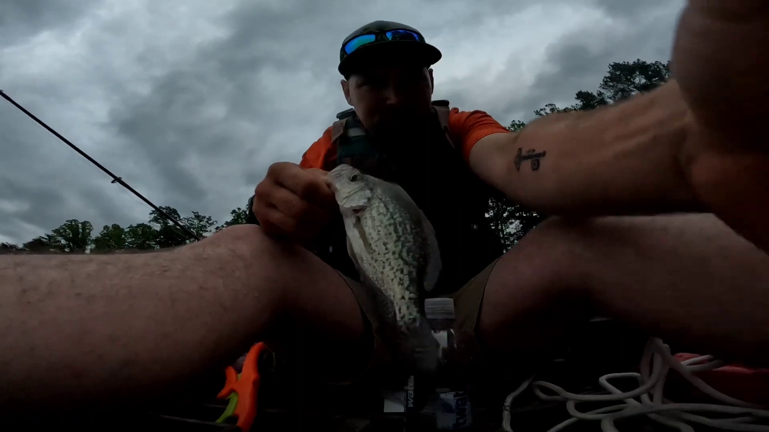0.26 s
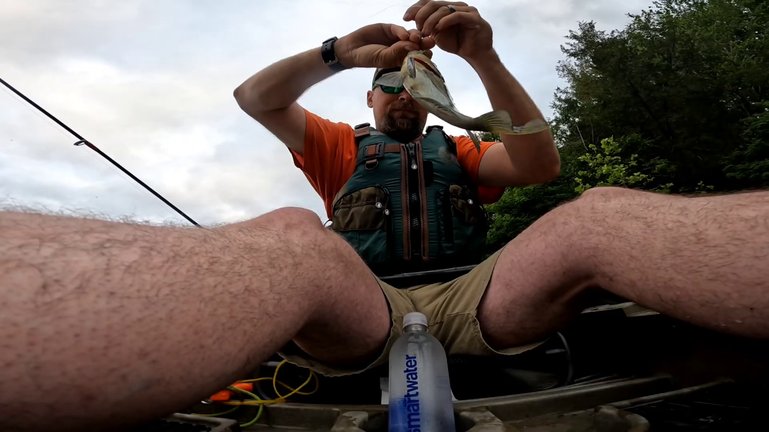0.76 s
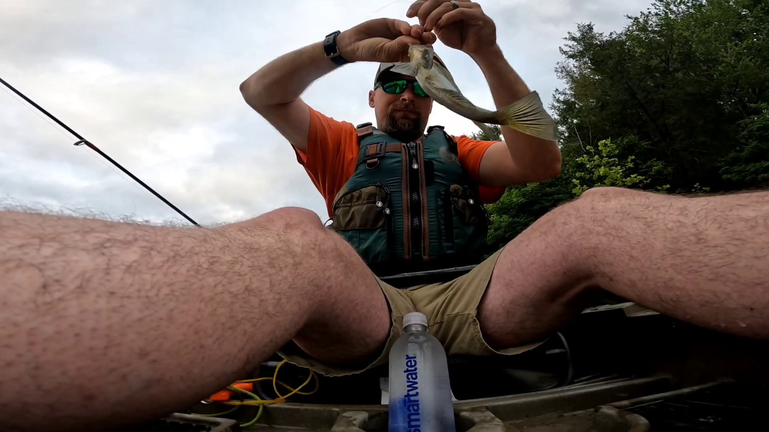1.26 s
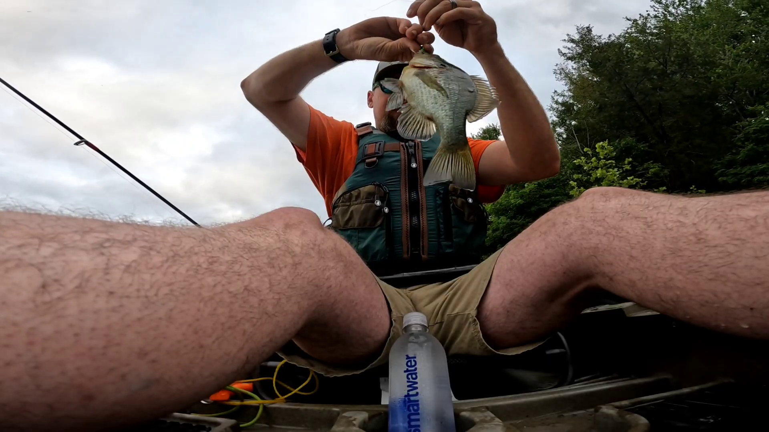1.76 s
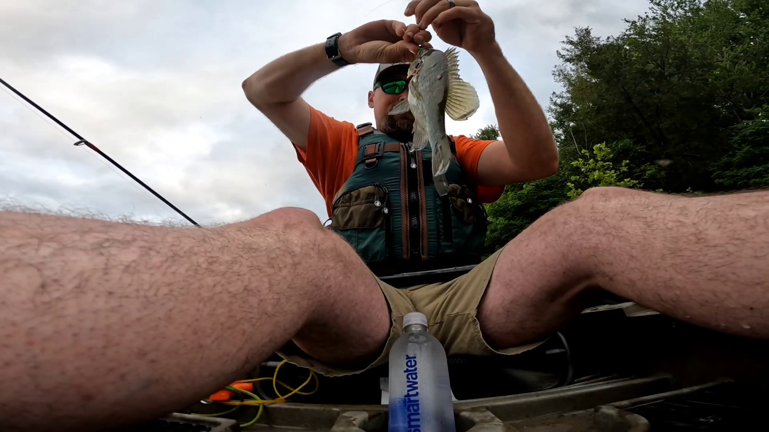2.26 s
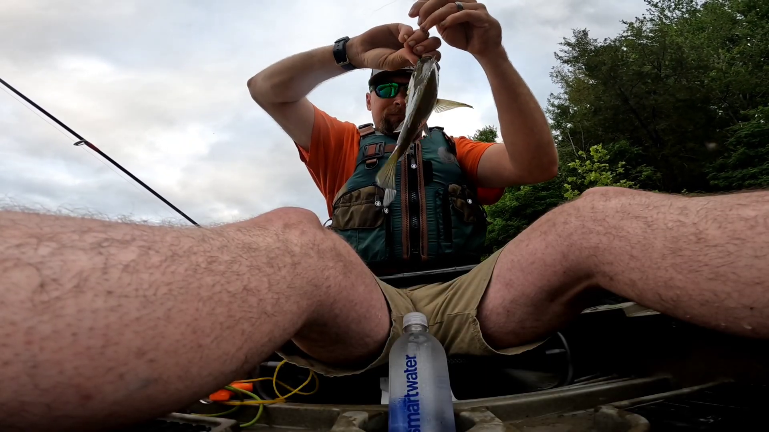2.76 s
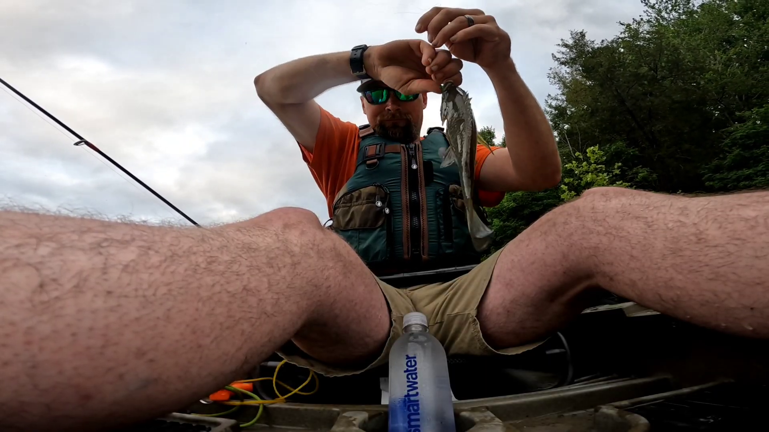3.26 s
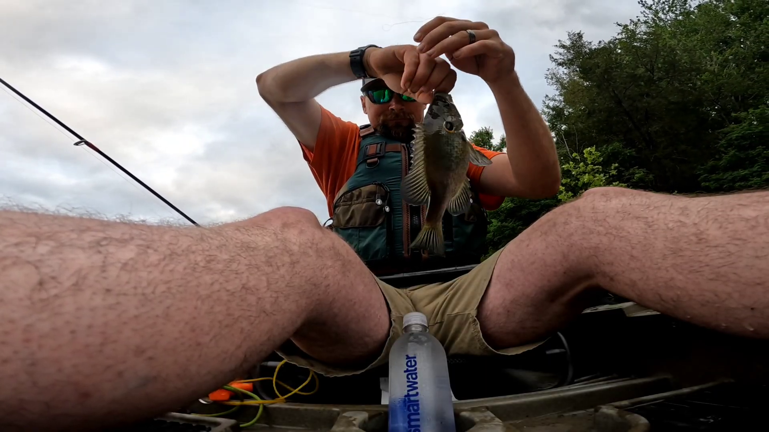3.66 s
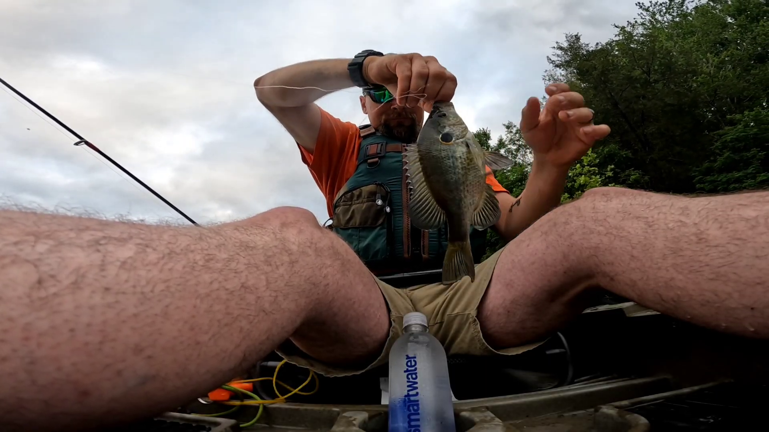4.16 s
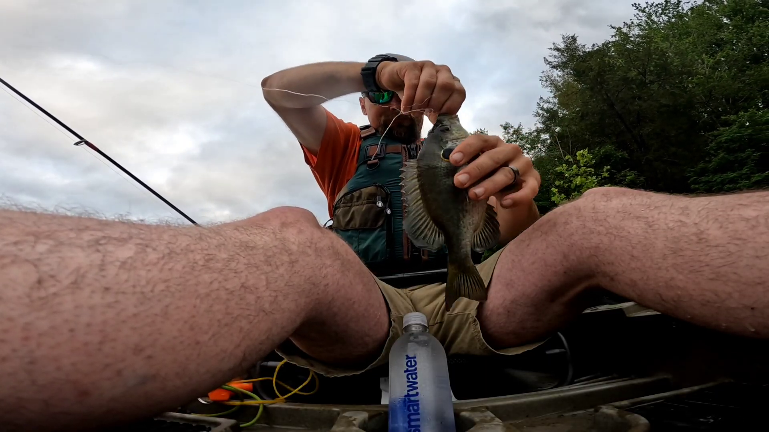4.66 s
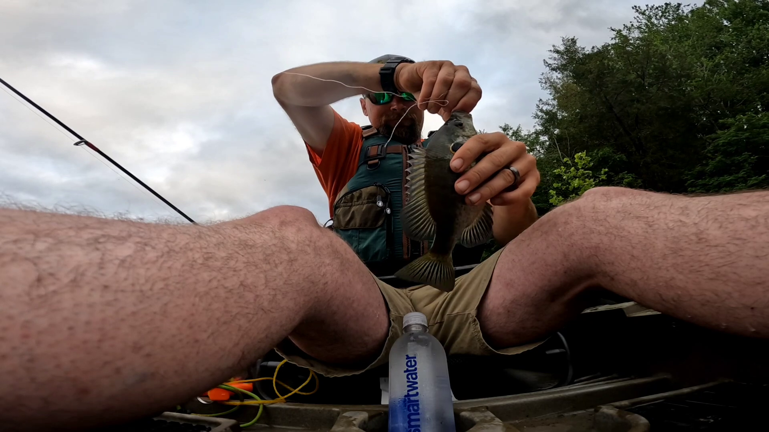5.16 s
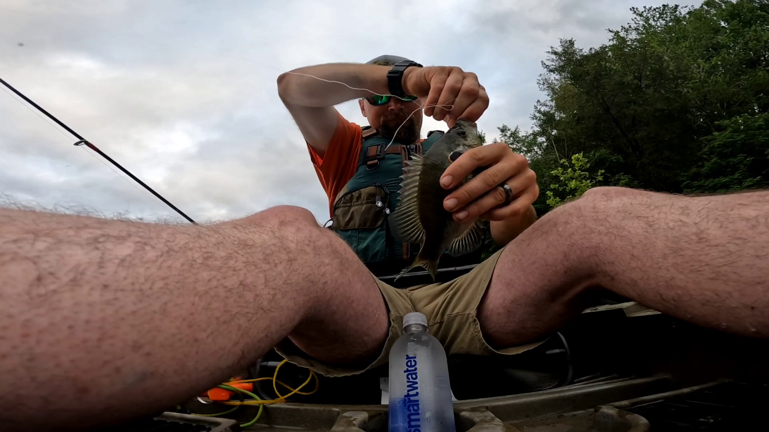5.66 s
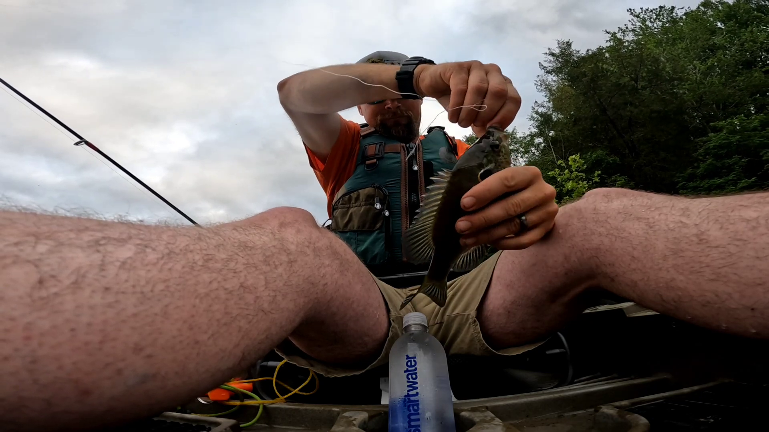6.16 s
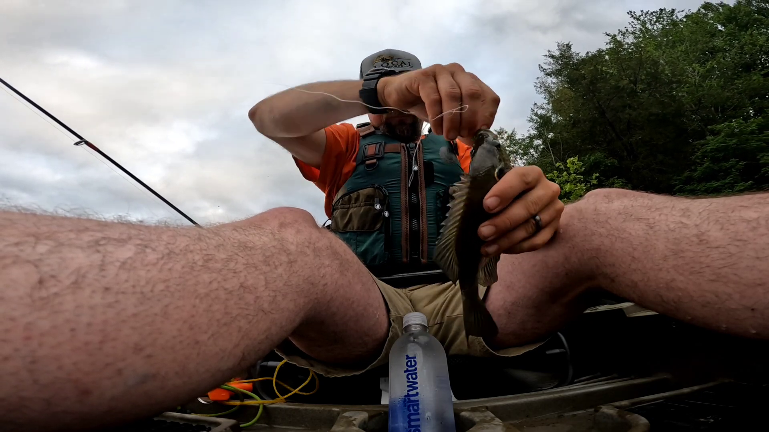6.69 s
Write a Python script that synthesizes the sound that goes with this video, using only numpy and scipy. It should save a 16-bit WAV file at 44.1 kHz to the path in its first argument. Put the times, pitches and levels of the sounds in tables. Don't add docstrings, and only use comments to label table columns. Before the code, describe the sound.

Brief low wind rumble, then a quiet lake with lapping water and songbirds, as a fish is handled amid hollow plastic knocks and small clinks.

```python
import sys
import numpy as np
from scipy import signal
from scipy.fft import rfft, irfft
from scipy.io import wavfile
from scipy.ndimage import uniform_filter1d

SR = 44100
rng = np.random.default_rng(int(sys.argv[2]) if len(sys.argv) > 2 else 0)


def log_audio(samples):
    frames = np.atleast_2d(samples).T
    limited = np.clip(frames, -1, 1)
    pcm = np.round(limited * 32767).astype(np.int16)
    wavfile.write(sys.argv[1], SR, pcm)


def gain_from_db(level_db):
    decades = np.asarray(level_db, float) / 20
    return 10 ** decades


N = 305613
T = np.arange(N) / SR

CHANGE_S, FADE_IN_S = 0.3165, (0.345, 0.42)
# time in seconds, level in dB.
GUST = [
    (0.0, -33),
    (0.05, -36),
    (0.165, -36),
    (0.19, -29),
    (0.29, -25),
    (0.316, -32),
]
# frequency in Hz, level in dB per Hz.
RUMBLE = [(6, -34), (11, -6), (22, 2.5), (32, -18), (55, -17), (76, -43), (130, -54), (210, -54),
          (420, -73), (900, -93)]
# frequency in Hz, level in dB per Hz.
ROAR = [(60, -19), (90, 3.5), (140, -1), (210, -8.5), (420, -21.5), (900, -56)]
# frequency in Hz, level in dB per Hz.
HISS = [(300, 2.5), (1000, 4), (2100, 3.5), (2600, -12), (3400, -7), (4300, 1), (5800, -0.5), (8000, -15.5),
        (9100, -21), (10500, -19), (14500, -34)]
# start in seconds, peak in dB, pitch in Hz.
GRIT = [
    (.068, -69, 10000),
    (.082, -74, 10500),
    (.135, -77, 6000),
    (.182, -69, 4500),
    (.226, -68, 10200),
    (.276, -73, 8500),
    (.3, -64, 9400),
]
ROAR_DB, HISS_DB = -54, -67.5
HAND_DB, HAND_HISS_DB, HAND_OFF_S, HAND_FADE_S = -57.5, -54.5, 0.033, 0.031
CHANGE_STEP_DB, SETTLE_S = -36, 0.012

# frequency in Hz, gain in dB.
HOUSING = [(20, 0.5), (5200, -6.5), (6300, -9.5), (7800, -14.5), (8700, -24), (9100, -38), (9600, -27),
           (11000, -25.5), (13000, -36.5), (16000, -50), (22000, -63)]
# time in seconds, level in dB, length in seconds.
PUFFS = [
    (0.677, -80, 0.04),
    (.86, -80, .05),
    (1.05, -81, .08),
    (1.49, -86, .06),
    (2.08, -91, .1),
    (2.805, -66, 0.036),
    (3.68, -86, 0.045),
    (3.845, -72, 0.067),
    (5.38, -82, .04),
    (6.6, -103, 0.25),
]
# frequency in Hz, level in dB per Hz.
SUB = [(20, -33), (40, 1), (60, 5), (90, 6), (130, -25)]
CALM_DB = -95

# time in seconds, lapping in dB, far chorus in dB.
LAKE = [(0.42, -63.5, -57), (0.69, -65.5, -52.5), (0.91, -67, -57.5), (1.47, -66.5, -59.5),
        (1.91, -70, -60.5), (2.41, -67, -58.5), (2.8, -68.5, -58.5), (3.4, -72, -61), (3.7, -63.5, -66.5),
        (4.08, -72.5, -62), (4.5, -65.5, -66), (4.77, -67, -66.5), (4.93, -61.5, -58), (5.1, -66.5, -65.5),
        (5.7, -69, -67.5), (5.95, -66, -63.5), (6.5, -66.5, -64.5), (6.93, -61.5, -60.5)]
# frequency in Hz, level in dB per Hz.
WASH = [(40, -41), (92, -56), (140, -5.5), (200, 1), (330, 1), (540, -5.5), (900, -12), (1120, -5),
        (1900, -13), (2600, -9.5), (4000, -33)]
# frequency in Hz, level in dB per Hz.
CHORUS = [(2200, -15.5), (2700, -8), (3440, 3.5), (4140, -3), (4600, -0.5), (5100, -8), (5800, -15.5),
          (7000, -40.5)]
# frequency in Hz, level in dB per Hz.
AIR = [(3500, 1.5), (5000, -10.5), (6300, -7.5), (7800, -14.5), (8700, -24), (9100, -34), (9600, -23),
       (11000, -21.5), (13000, -29), (14600, -34), (15800, -37)]
AIR_DB, AIR_PER_LAP, AIR_PER_CHORUS = -79.5, 0.37, 0.31

# start in seconds, length in seconds, from Hz, to Hz,
# level in dB.
NOTES = [(1.218, 0.029, 3756, 3140, -49.5), (1.249, 0.06, 3040, 2640, -56.5), (1.3, 0.028, 2590, 2040, -62),
         (1.403, 0.019, 3720, 3060, -48), (1.419, 0.057, 3030, 2596, -57.5),
         (1.476, 0.031, 2650, 2170, -56.5), (5.771, 0.011, 4260, 3780, -59),
         (1.867, 0.018, 4900, 4900, -60), (2.048, 0.045, 5320, 5070, -51), (2.113, 0.019, 4680, 4440, -55),
         (2.143, 0.029, 4100, 3550, -43), (2.31, 0.054, 3835, 2590, -48.5), (2.563, 0.028, 6580, 5650, -52),
         (2.719, 0.039, 4790, 3280, -46.5), (2.87, 0.02, 7130, 6100, -50.5),
         (3.177, 0.015, 5000, 4520, -42), (3.379, 0.019, 4840, 4530, -47), (3.425, 0.028, 3680, 2700, -52),
         (4.742, 0.017, 4250, 4030, -54), (4.846, 0.039, 3600, 2685, -51.5),
         (5.901, 0.041, 3100, 2435, -55),
         (1.95, 0.03, 4800, 4800, -57.5), (2.317, 0.054, 3740, 4180, -44.5),
         (2.354, 0.033, 5230, 5260, -68), (2.376, 0.019, 2494, 4120, -49.5),
         (2.398, 0.069, 4135, 5310, -43.5), (2.605, 0.045, 5120, 5640, -46),
         (2.785, 0.045, 3180, 5430, -44.5), (2.909, 0.033, 5000, 4880, -53),
         (3.405, 0.027, 2986, 3645, -49.5), (4.915, 0.039, 2700, 3300, -52.5),
         (4.947, 0.083, 3370, 3360, -54.5), (5.858, 0.034, 2710, 3210, -53.5),
         (5.865, 0.024, 3520, 3480, -55), (5.899, 0.012, 3360, 3520, -47), (5.924, 0.01, 3484, 3400, -46),
         (5.947, 0.015, 3430, 3480, -53), (5.796, 0.021, 3160, 3140, -49.5),
         (5.743, 0.018, 3140, 3800, -52), (5.765, .012, 3800, 4320, -53), (3.568, 0.022, 2970, 3740, -52),
         (5.991, 0.013, 2820, 3220, -54), (6.024, 0.019, 2840, 3190, -58), (6.053, 0.016, 2715, 3120, -57),
         (6.21, 0.045, 4300, 4500, -57), (6.47, 0.095, 3320, 3700, -68), (6.639, 0.062, 3520, 3840, -59),
         (6.688, 0.35, 3750, 3780, -56), (6.765, 0.021, 3740, 4150, -49.5),
         (1.886, 0.052, 4880, 4670, -60), (2.165, 0.019, 3750, 3520, -53),
           (2.201, 0.063, 3810, 4020, -55), (2.396, 0.021, 3890, 3380, -49),
           (2.452, 0.0093, 5600, 5620, -58), (2.466, .01, 5620, 5660, -58), (2.477, .01, 5640, 5640, -59),
           (2.49, .01, 5570, 5760, -53), (2.582, 0.023, 5620, 5200, -54), (2.36, .03, 5180, 5270, -61),
           (3.157, 0.022, 5100, 5030, -63), (3.192, 0.0086, 4620, 4520, -46),
           (3.267, 0.055, 2300, 2137, -64), (3.403, 0.013, 3110, 3400, -61), (3.45, 0.025, 2755, 2630, -60),
           (5.781, 0.0152, 3795, 3200, -46.5), (5.844, .014, 3390, 3570, -56),
           (5.89, 0.025, 2650, 3640, -51), (5.943, 0.021, 2190, 2490, -62), (5.967, 0.012, 2990, 3530, -59),
           (6.101, 0.055, 4010, 4420, -61), (6.165, 0.036, 4270, 4040, -59),
           (2.413, 0.014, 4480, 4650, -40), (1.396, 0.0098, 3760, 3830, -48)]
# start in seconds, length in seconds, foot in Hz, top in Hz, level in dB.
ARCHES = [
    (3.103, .042, 3550, 4030, -49),
    (3.293, .054, 3500, 4000, -49),
    (3.58, .075, 3600, 4090, -51),
]
# start in seconds, length in seconds, level in dB.
TRILLS = [
    (0.471, 0.36, -50.5),
    (1.8, 0.32, -55.5),
    (2.835, 0.32, -56),
    (3.831, 0.37, -62.5),
    (5.2, 0.21, -65.5),
]
# start in seconds, length in seconds, from Hz, to Hz, level in dB.
HIDDEN = [(2.43, .09, 4030, 4430, -54), (2.5, .1, 4600, 3700, -57), (2.565, .07, 3920, 4250, -55),
          (2.62, .08, 3900, 3300, -59), (.58, .12, 3800, 3950, -58), (4.95, .12, 3400, 3400, -60),
          (4.74, .07, 4150, 3700, -61), (6.2, .12, 4300, 4500, -64), (5.85, .2, 3400, 3100, -62),
          (.7, .09, 3300, 3200, -56), (2.0, .1, 3300, 3350, -61)]
NOTE_SWELL_DB, TRILL_SWELL_DB = -5, -7
RISE_BEND, ARCH_SHARP = 0.8, 1.83
TRILL_TOP_HZ, TRILL_LOW_HZ, TRILL_DROP_S, TRILL_GLIDE_S = 3554, 2782, 0.145, 0.1
TRILL_SWEEP_HZ, TRILL_SWEEPS_PER_S, TRILL_SWEEP_AT_S, TRILL_SWEEP_S = 108, 29, 0.217, 0.072
TRILL_END_S, TRILL_END_LENGTH_S, TRILL_END_HZ, TRILL_END_DB = 0.265, 0.1, 2820, 0

# start in seconds, peak in dB, ring in ms.
DRIPS = [
    (0.629, -47, 7.3),
    (.649, -37.5, 2.7),
    (1.18, -49.5, 5.2),
    (1.405, -50, 2.7),
    (1.444, -41.5, 2.7),
    (2.653, -54, 3),
    (3.29, -62, 11),
]
# start in seconds, peak in dB, pitch in Hz.
CLINKS = [
    (3.886, -46, 3600),
    (4.772, -45.5, 2800),
    (4.813, -34.5, 3460),
    (4.902, -21.5, 3230),
    (4.904, -41, 2220),
    (6.393, -43, 3440),
]
# start in seconds, peak in dB, pitch in Hz.
SNAPS = [(0.761, -40, 5660), (1.178, -45, 6870), (1.436, -45.5, 7100), (3.42, -48, 5800), (4.54, -50, 7000),
         (4.857, -40, 5800), (4.946, -43, 4500), (5.217, -54, 7550), (5.024, -42, 6430), (5.138, -42, 4220),
         (5.491, -45, 8100), (5.931, -46, 3900), (6.061, -54, 9050), (6.081, -42, 7850), (6.127, -41, 7520),
         (6.138, -44, 6900)]
# start in seconds, peak in dB, pitch in Hz.
MORE_SNAPS = [(.827, -42, 6380), (1.247, -59, 7240), (1.41, -54, 8100), (4.814, -44.5, 1290), (4.814, -52, 6440),
              (4.856, -41, 3340), (4.857, -42, 7900), (4.89, -56, 1190), (4.904, -55, 1410), (4.944, -39, 3200),
              (4.97, -54, 4600), (4.981, -59, 5500), (6.394, -46, 1430)]
# start in seconds, peak in dB, pitch in Hz.
PATS = [
    (2.76, -37, 885),
    (4.779, -42.5, 804),
    (4.88, -68, 327),
    (4.936, -46, 397),
    (4.97, -38, 308),
    (5.136, -45, 1400),
]
# start in seconds, peak in dB.
FLICKS = [
    (3.068, -45),
    (3.078, -49),
    (3.087, -44),
    (3.253, -48),
    (3.267, -47),
    (3.281, -43),
]
DRIP_HZ, DRIP_NOISY = 2130, 0.13
CLINK_MS, CLINK_NOISY = 2.76, 0.22
SNAP_MS, SNAP_NOISY = 2.6, 0.9
PAT_TURNS, PAT_NOISY = 3.0, 0.6
FLICK_HZ, FLICK_MS, FLICK_NOISY = 6600, 6.0, 0.55
CRACKLE_S, CRACKLE_PER_S, CRACKLE_DB = (4.8, 5.0), 230, -56

# start, hardest and end in
# seconds, pressure in dB, fizz in dB over pressure.
RUBS = [
    (.5, 0.678, 0.82, -72.5, -9),
    (2.698, 3.004, 3.6, -85.5, 5),
    (4.007, 4.23, 4.285, -57, -38),
    (4.716, 4.94, 5.04, -63, -21),
    (5.5, 6.092, 7.8, -70, -15),
    (6.457, 6.643, 7.3, -68, -9),
]
# frequency in Hz, level in dB per Hz.
RUB = [(200, -16), (450, -3.5), (820, -4), (1120, -2), (1600, -12), (2000, -5), (2900, -5.5), (4600, -15.5),
       (6500, -27), (8500, -35), (9100, -47), (10800, -45), (14500, -68)]
# start, hardest and end in seconds, level in dB.
DRAGS = [
    (4.07, 4.21, 4.29, -54.5),
    (5.5, 5.8, 6.05, -66),
    (4.35, 4.6, 4.75, -69),
]
# frequency in Hz, level in dB per Hz.
DRAG = [(350, -18), (720, -1), (880, -6), (1100, -2), (1400, -18), (1800, -19), (2020, -6), (2500, -20)]
RUB_ENDS_DB = -19

# start in seconds, peak in dB, contact time in ms.
KNOCKS = [
    (2.7677, -11.5, .13),
    (2.8074, -18.5, .48),
    (2.8558, -28, .65),
    (3.6657, -15, .18),
    (3.7877, -18, .19),
    (5.3825, -21.5, .15),
]
THUMP_DB = [-1.5, -1.5, -1.5, -3.5, -3, -6]
# frequency in Hz, level in dB, 60 dB decay in seconds, rise in ms.
HULL = [(161.5, -26.5, 0.31, 6.3), (232, -20, 0.18, 1.7), (307, -16, 0.16, 7.4), (352.6, -15.5, 0.14, 4.7),
        (440.5, -11, 0.1, 7.1), (472, -17, 0.099, 19), (539, -16, 0.11, 3), (679.6, 1, 0.035, 3.16),
        (792, 0.5, 0.023, 2.4), (873, -4.5, 0.047, 1.2), (1044, 9, 0.02, 1.27), (1230, -3.5, 0.049, 4),
        (1333, -17, 0.054, 7.9), (1430, -5.5, 0.027, 5.5), (1797, 4.5, 0.019, 3.1),
        (2029, 0.5, 0.017, 1.67), (2293, -5, 0.02, 1.1), (2700, -13, 0.033, 1), (2470, -12, 0.028, 1.4),
        (3520, 3.5, 0.017, 5.9), (3905, -7.5, 0.026, 0.23), (4500, -3, 0.014, 2.9),
        (6570, -14, 0.0063, 3.1), (7850, -33, 0.017, 2.4)]
# delay in seconds, level in dB.
WELL = [
    (.0062, -20),
    (.0093, -24),
    (.0128, -17.5),
]
SPOT_DB, THUMP_HZ, WELL_HZ = 2, 520, (520, 2600)


def evened(x):
    return x / np.sqrt(np.mean(x ** 2) + 1e-20)


def smooth_noise(size):
    return evened(uniform_filter1d(rng.standard_normal(N), size=size))


def curve(rows, column):
    rows = np.transpose(rows)
    return np.interp(T, rows[0], rows[column])


def add(mix, s, sound):
    part = mix[round(s * SR):][:len(sound)]
    part += sound[:len(part)]


def noise(colour, patchy_db, size=1024):
    hz = np.fft.rfftfreq(size, 1 / SR)
    f, db = np.transpose(colour)
    a, b, patches = rng.standard_normal((4 * N // size + 5, len(hz), 3)).T
    patches = uniform_filter1d(patches, size=9, axis=0)
    patches = evened(uniform_filter1d(patches, size=9, axis=1))
    tilt_db = np.interp(np.log(hz + 1), np.log(f + 1), db, -90, -110)
    z = (a + 1j * b) * gain_from_db(tilt_db[:, None] + patchy_db * patches)
    return evened(signal.istft(z, nperseg=size, noverlap=3 * size // 4)[1][:N])


def muffled(x):
    f, db = np.transpose(HOUSING)
    log_gain = np.log(gain_from_db(np.interp(abs(np.fft.fftfreq(2048, 1 / SR)), f, db)))
    taps = np.fft.ifft(np.exp(np.conj(signal.hilbert(log_gain)))).real[:1024]
    return signal.oaconvolve(x, taps)[:N]


def shore(x, t60, first_s):
    t = np.arange(SR // 2) / SR
    tail = rng.standard_normal(len(t)) * gain_from_db(-60 * t / t60) * (t > first_s)
    z = rfft(tail)
    tail = irfft(z / uniform_filter1d(abs(z), size=7)) * (t > first_s)
    return signal.fftconvolve(x, tail / np.linalg.norm(tail))[:N]


def ticks(rows):
    t, out = np.arange(SR // 25) / SR, np.zeros(N)
    grit = rng.standard_normal((len(rows), len(t)))
    for (s, db, hz, ring_ms, noisy), g in zip(rows, grit):
        u = 2500 * t / ring_ms
        swell = u * np.exp(1 - u)
        share = np.clip(noisy, 0, 1)
        wobble = evened(uniform_filter1d(g, size=max(int(SR / hz), 2)))
        tone = (1 - share + share * wobble) * np.sin(2 * np.pi * hz * t)
        add(out, s - 0.001, gain_from_db(db) * swell * tone)
    return out


def windy_opening():
    shared, own = noise(RUMBLE, 0, size=8192), noise(RUMBLE, 0, size=8192)
    before = T < CHANGE_S
    wind = np.array([shared + 0.4 * own, shared - 0.4 * own]) / shared[before].std() * gain_from_db([[-3.2], [2.2]])
    hand = np.clip(1 - (T - HAND_OFF_S) / HAND_FADE_S, 0, 1)
    hiss = np.array([noise(HISS, 4.3), noise(HISS, 5.6)]) * (gain_from_db(HISS_DB) + gain_from_db(HAND_HISS_DB) * hand)
    wind = wind * gain_from_db(curve(GUST, 1))
    last = wind[:, before][:, -1:]
    wind -= (last + gain_from_db(CHANGE_STEP_DB)) * np.exp(np.minimum(T - CHANGE_S, 0) / SETTLE_S)
    roar = noise(ROAR, 2.5, size=2048)
    roar = roar + 0.23 * noise(ROAR, 2.7, size=2048) * np.array([[1], [-1]])
    grit = ticks([(*r, 3.5, 0.9) for r in GRIT])
    rub = noise(RUB, 5.6) * gain_from_db(HAND_DB) * (hand + 0.068)
    return (wind + gain_from_db(ROAR_DB) * roar + hiss + grit + rub) * uniform_filter1d(1.0 * before, size=3)


def puffs():
    swell = gain_from_db(CALM_DB) + sum(gain_from_db(db) * np.exp(-((T - s) / length) ** 2) for s, db, length in PUFFS)
    return noise(SUB, 4.6, size=4096) * swell * gain_from_db(-6.5)


def lake():
    lap_db, chorus_db = curve(LAKE, 1), curve(LAKE, 2)
    air_db = AIR_DB + AIR_PER_LAP * (lap_db - lap_db.mean()) + AIR_PER_CHORUS * (chorus_db - chorus_db.mean())
    wash = noise(WASH, 2.0, size=2048) * gain_from_db(lap_db + 4.5)
    chorus = noise(CHORUS, 1.9) * gain_from_db(chorus_db + 1.56)
    return wash + chorus + noise(AIR, 1.8) * gain_from_db(air_db + 5)


def whistle(start, length, hz, db, swell_db, edge):
    u = np.arange(-0.005, length + 0.0023, 1 / SR) / length
    tone = np.sqrt(2) * np.sin(2 * np.pi * np.cumsum(hz(np.clip(u, 0, 1))) / SR)
    swell = gain_from_db(db + swell_db * (2 * u - 1) ** 2)
    return start - 0.005, tone * swell * signal.windows.tukey(len(u), min(edge / length, 1))


def trill_hz(t):
    slide = (TRILL_TOP_HZ - TRILL_LOW_HZ) / (1 + np.exp((t - TRILL_DROP_S) / TRILL_GLIDE_S * 2))
    swing = TRILL_SWEEP_HZ * np.exp(-((t - TRILL_SWEEP_AT_S) / TRILL_SWEEP_S) ** 2)
    return TRILL_LOW_HZ + slide + swing * np.sin(2 * np.pi * TRILL_SWEEPS_PER_S * t)


def birds():
    near, far = np.zeros(N), np.zeros(N)
    for s, length, a, b, db in NOTES:
        bend = RISE_BEND if b > a else 1
        add(near, *whistle(s, length, lambda u: a + (b - a) * u ** bend, db, NOTE_SWELL_DB, 0.0055))
    for s, length, foot, top, db in ARCHES:
        arch = lambda u: top - (top - foot) * abs(2 * u - 1) ** ARCH_SHARP
        add(near, *whistle(s, length, arch, db, NOTE_SWELL_DB, 0.0054))
    for s, length, db in TRILLS:
        add(far, *whistle(s, length, lambda u: trill_hz(u * length), db, TRILL_SWELL_DB, 0.038))
        if length > TRILL_END_S:
            held = lambda u: TRILL_END_HZ + 0 * u
            add(near, *whistle(s + TRILL_END_S, TRILL_END_LENGTH_S, held, db + TRILL_END_DB, -9.0, 0.02))
    for s, length, a, b, db in HIDDEN:
        add(far, *whistle(s, length, lambda u: a + (b - a) * u, db, TRILL_SWELL_DB, 0.02))
    beat = 2 * np.pi * np.cumsum(45 + 14 * smooth_noise(1500)) / SR
    far *= (1 + 1.0 * np.sin(beat)) * np.sqrt(2) * np.cos(1.53 * np.cos(beat) + 0.6)
    near *= gain_from_db(2.4 * smooth_noise(300))
    near = near + gain_from_db(-5) * shore(near, 0.08, 0.002)
    near_echo = gain_from_db(-5) * shore(near, 1.0, 0.013)
    return near + near_echo + gain_from_db(-6) * far + gain_from_db(2.5) * shore(far, 0.7, 0.004)


def small_parts():
    rows = [(s, db, DRIP_HZ, ms, DRIP_NOISY) for s, db, ms in DRIPS]
    rows += [(*r, CLINK_MS, CLINK_NOISY) for r in CLINKS]
    rows += [(*r, SNAP_MS, SNAP_NOISY) for r in SNAPS]
    rows += [(*r, 1000 * PAT_TURNS / r[2], PAT_NOISY) for r in PATS]
    rows += [(*r, FLICK_HZ, FLICK_MS, FLICK_NOISY) for r in FLICKS]
    return ticks(rows)


def crackle():
    when, size = rng.random(N), rng.exponential(1, N)
    closing = (T > CRACKLE_S[0]) * (T < CRACKLE_S[1])
    clicks = (when < CRACKLE_PER_S / SR) * closing * gain_from_db(CRACKLE_DB + 2.7 * np.minimum(size, 3))
    puff = np.exp(-np.arange(200) / SR / 0.0006)
    grit = uniform_filter1d(rng.standard_normal(N), size=3)
    return np.diff(signal.oaconvolve(clicks, puff)[:N] * grit, prepend=0)


def rubs():
    press, fizz = np.zeros((2, N))
    for start, hardest, end, db, fizz_db in RUBS:
        stroke_db = np.interp(T, [start, hardest, end], [db + RUB_ENDS_DB, db, db + RUB_ENDS_DB])
        stroke = gain_from_db(stroke_db) * (T > start) * (T < end)
        press = press + stroke
        fizz = fizz + gain_from_db(fizz_db) * stroke
    grain = gain_from_db(2.5 * smooth_noise(150))
    body = evened(noise(RUB, 0.62) * grain) * uniform_filter1d(press, size=2200) * gain_from_db(7.5)
    return body + evened(noise(AIR, 2.0) * grain) * uniform_filter1d(fizz, size=2200) * gain_from_db(12.5)


def drags():
    press = np.zeros(N)
    for start, hardest, end, db in DRAGS:
        stroke_db = np.interp(T, [start, hardest, end], [db - 10, db, db - 7])
        press += gain_from_db(stroke_db) * (T > start) * (T < end)
    return noise(DRAG, 2.5) * uniform_filter1d(press, size=1500)


def hull_rings(t):
    phase, spread = rng.uniform(-1.207, 1, (2, len(HULL), 8, 1))
    phase[:, 0] = spread[:, 0] = 0
    weaker = gain_from_db(-11 * (np.arange(8) > 0))[:, None]
    rings = []
    for (hz, db, t60, rise_ms), p, d in zip(HULL, phase, spread):
        late = t - 0.004 * min(1200 / hz, 1) ** 0.6
        swell = (1 - np.exp(-1500 * t / rise_ms)) ** 2 * gain_from_db(db - 60 * t / t60)
        cluster = weaker * -np.cos(2 * np.pi * hz * (1 + 0.134 * d) * late + np.pi * p)
        rings.append(swell * cluster.sum(0))
    return rings


def knocks():
    t, out, crack = np.arange(SR // 3) / SR, np.zeros(N), np.zeros(N)
    rings = hull_rings(t)
    mode_hz = np.transpose(HULL)[0]
    grit = rng.standard_normal((len(KNOCKS), len(t))) * t / 0.0014 * np.exp(1 - t / 0.0028)
    spots = rng.standard_normal((len(KNOCKS), len(HULL)))
    well_band = signal.butter(2, WELL_HZ, "band", fs=SR, output="sos")
    for (s, db, contact_ms), g, spot, thump_db in zip(KNOCKS, grit, spots, THUMP_DB):
        reach = 1 / (1 + (mode_hz * contact_ms / 1000) ** 4)
        drive_db = SPOT_DB * spot + thump_db / (1 + (mode_hz / THUMP_HZ) ** 4)
        ring = (reach * gain_from_db(drive_db)) @ rings
        ring = gain_from_db(db) * ring / abs(ring).max()
        add(out, s, ring)
        back = signal.sosfilt(well_band, ring)
        for delay, echo_db in WELL:
            add(out, s + delay, gain_from_db(echo_db) * back)
        add(crack, s, gain_from_db(db - 21.0 - 27 * contact_ms) * g)
    blow = out + muffled(crack) + gain_from_db(-22.0) * shore(out, 0.29, 0.0037)
    return signal.sosfilt(signal.butter(4, 11500, fs=SR, output="sos"), blow)


def scene():
    calm = lake() + muffled(birds() + small_parts()) + knocks() + rubs()
    more_snaps = ticks([(*r, SNAP_MS, SNAP_NOISY) for r in MORE_SNAPS])
    calm += muffled(more_snaps + crackle())
    calm = signal.sosfilt(signal.butter(2, 120, "high", fs=SR, output="sos"), calm)
    calm += puffs()
    fade = np.clip((T - FADE_IN_S[0]) / (FADE_IN_S[1] - FADE_IN_S[0]), 0, 1) ** 1.6
    side_noise = gain_from_db(-91) * rng.standard_normal(N) * np.array([[1], [-1]])
    return windy_opening() + (calm + side_noise + drags()) * fade


def roll_off(x):
    return signal.sosfilt(signal.butter(12, 15600, fs=SR, output="sos"), x)


def record(dry):
    return roll_off(dry)


dry = scene()
out = record(dry)
log_audio(out)
```